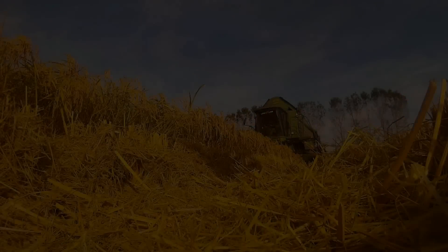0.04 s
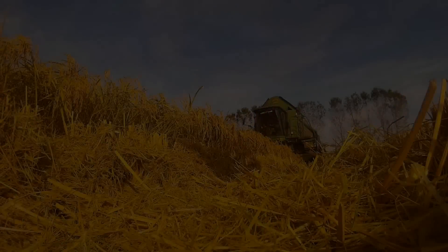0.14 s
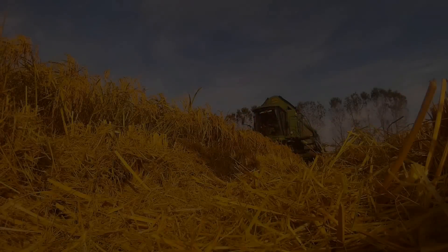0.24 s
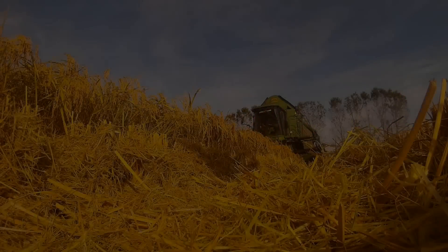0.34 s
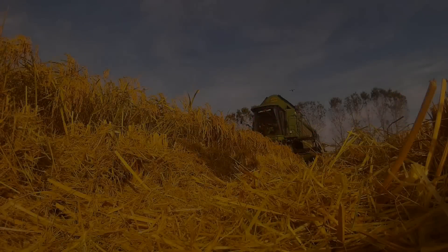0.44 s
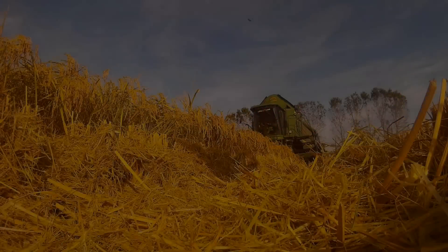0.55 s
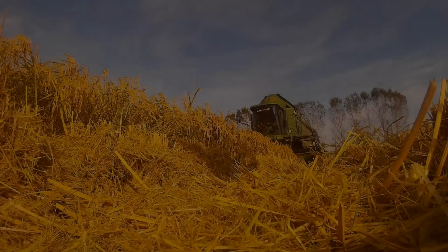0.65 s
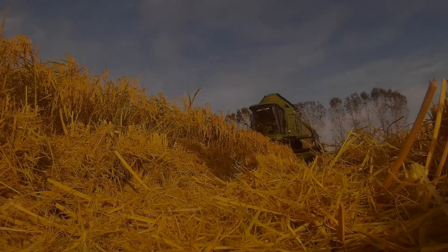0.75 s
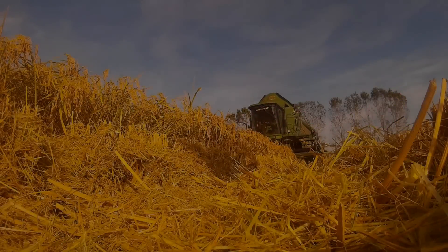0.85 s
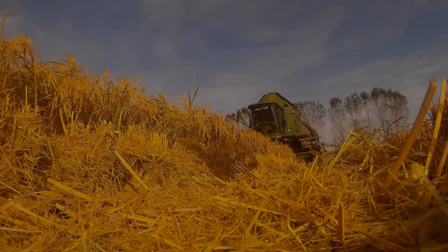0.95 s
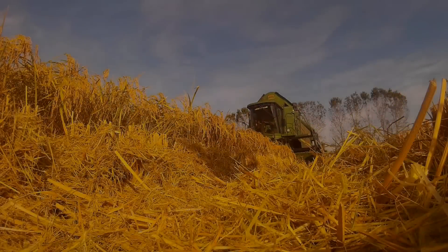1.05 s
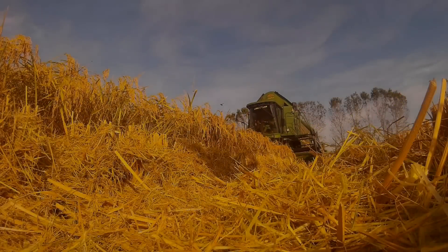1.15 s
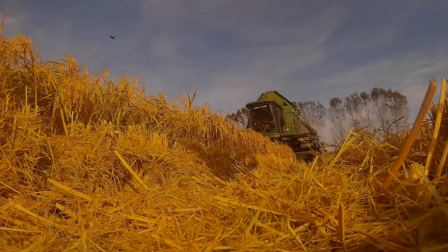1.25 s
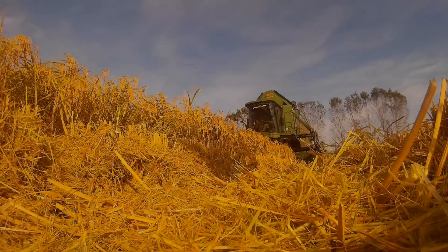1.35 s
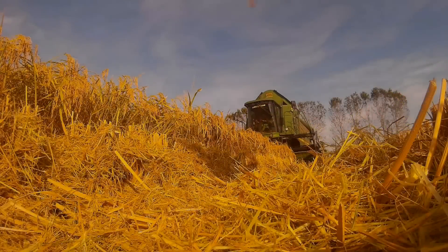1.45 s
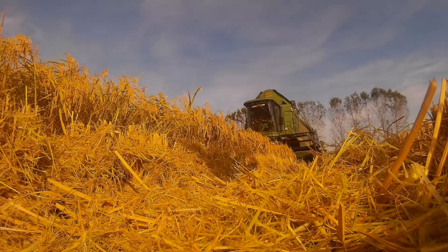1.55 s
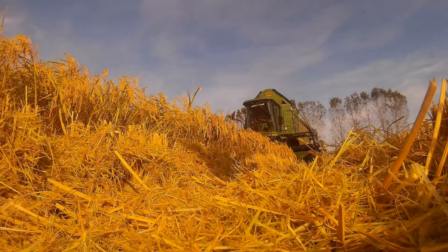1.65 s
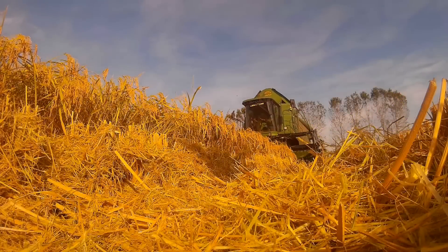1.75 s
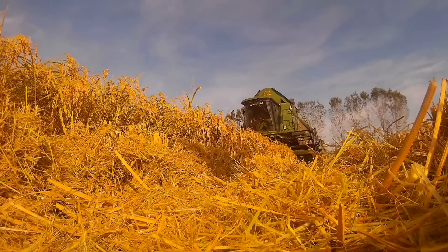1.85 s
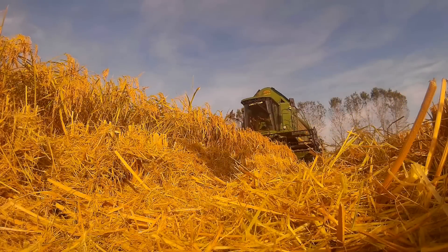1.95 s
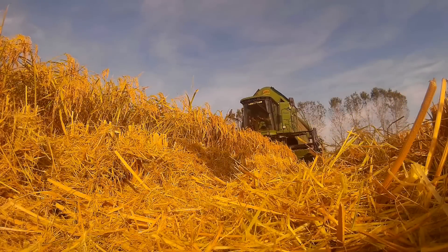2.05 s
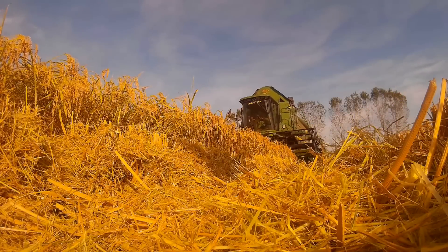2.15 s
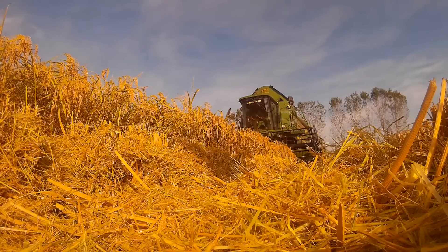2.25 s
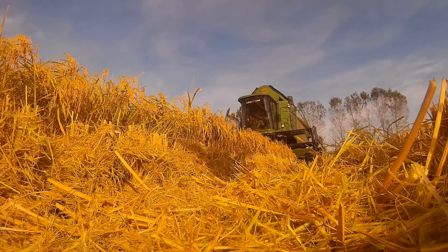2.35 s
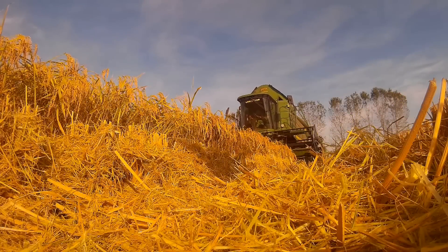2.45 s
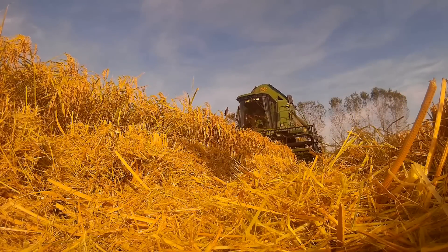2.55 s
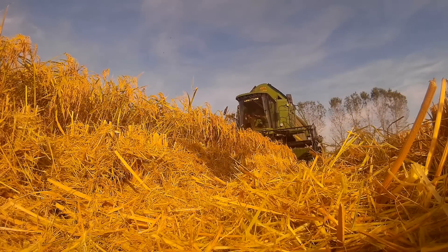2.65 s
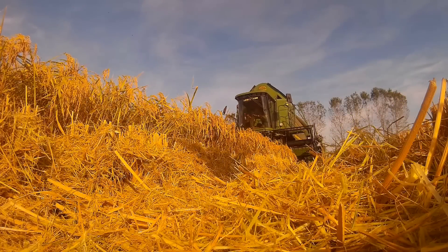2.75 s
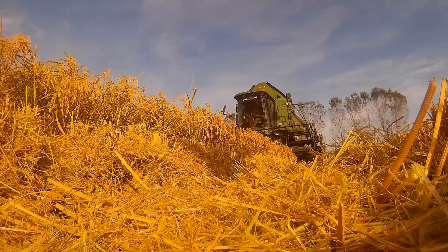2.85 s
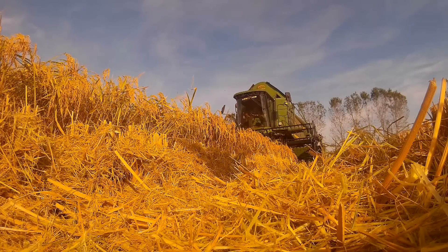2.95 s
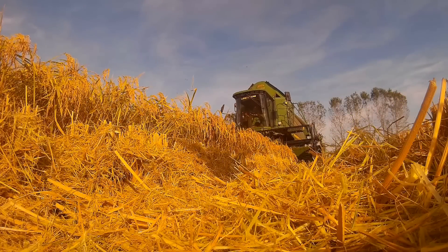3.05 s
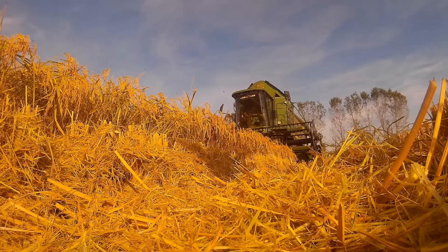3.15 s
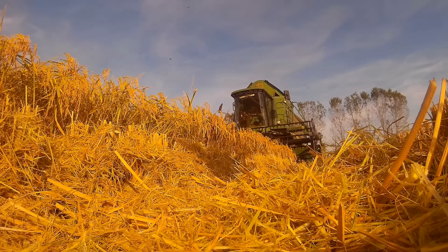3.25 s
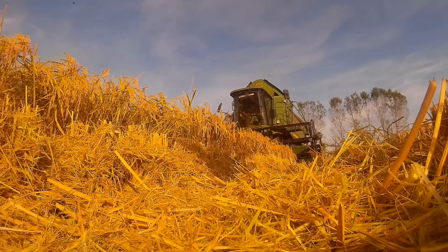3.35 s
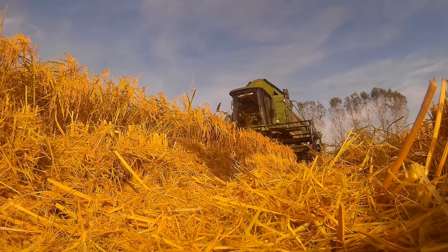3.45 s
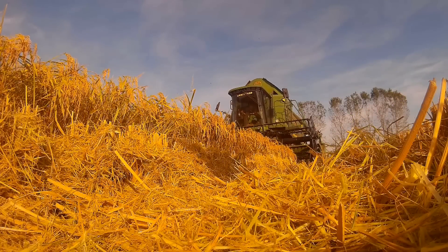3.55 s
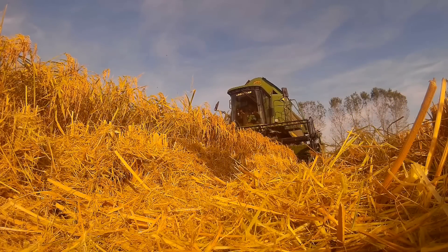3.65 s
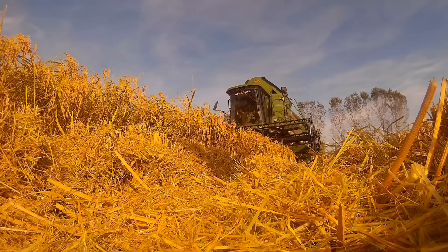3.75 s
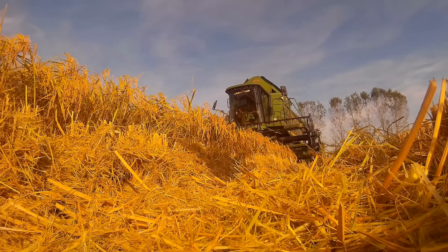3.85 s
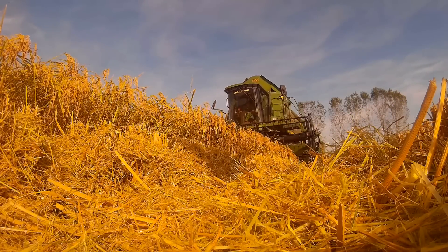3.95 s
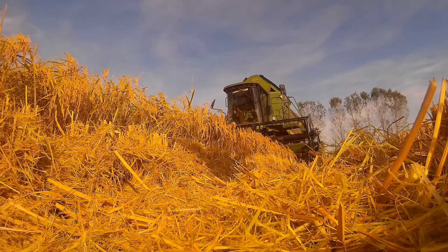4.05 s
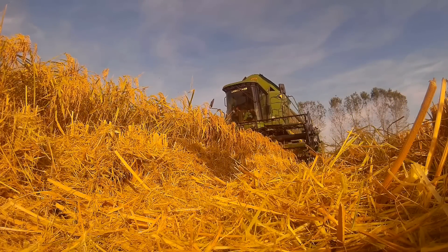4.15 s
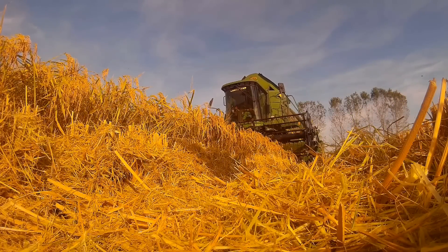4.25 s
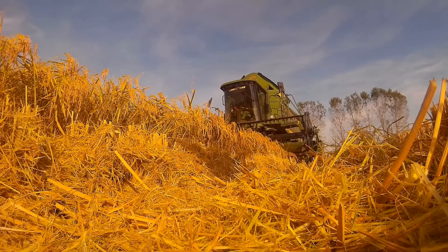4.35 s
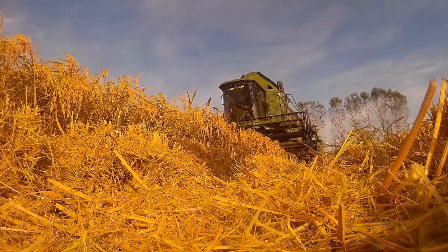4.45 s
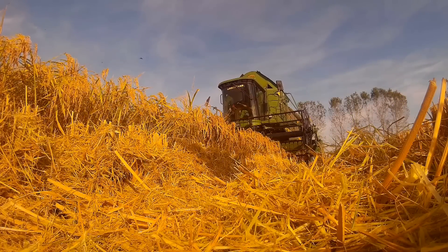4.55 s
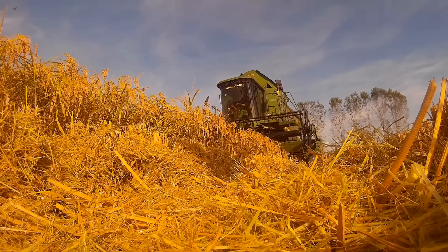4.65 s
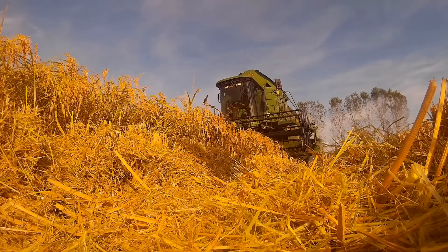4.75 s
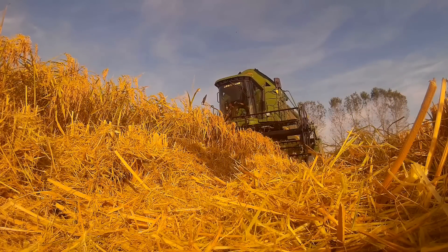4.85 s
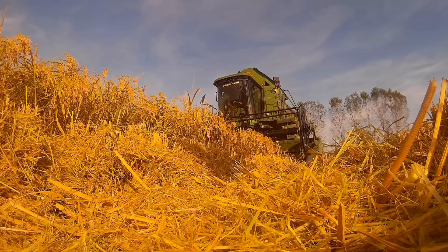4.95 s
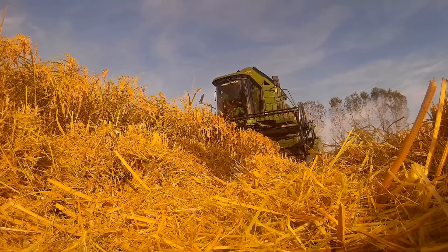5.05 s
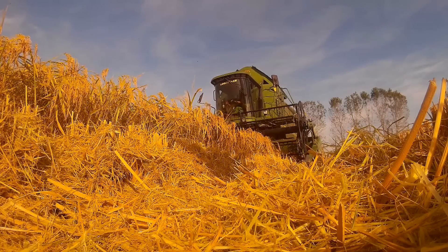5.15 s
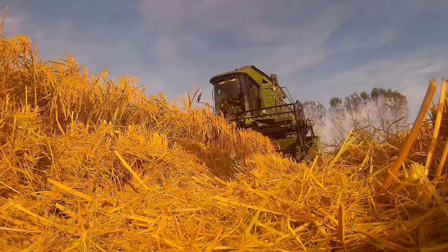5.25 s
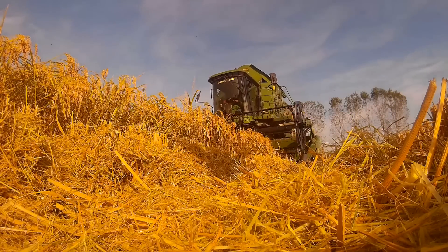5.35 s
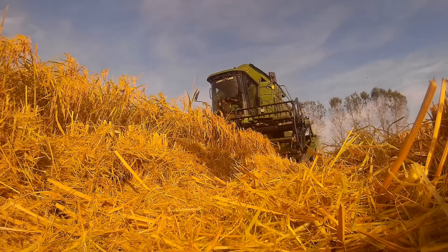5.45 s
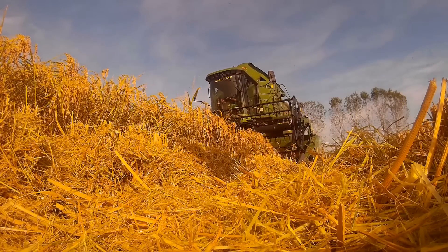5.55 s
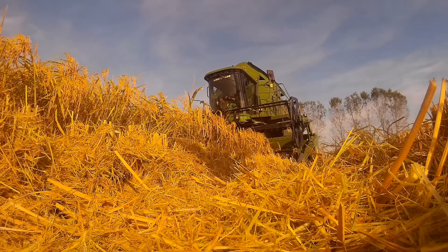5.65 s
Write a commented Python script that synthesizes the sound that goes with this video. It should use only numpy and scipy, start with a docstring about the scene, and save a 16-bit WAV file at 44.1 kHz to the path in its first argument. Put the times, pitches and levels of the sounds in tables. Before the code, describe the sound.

A combine harvester drones steadily across a straw field, fading in from quiet and growing slightly louder as it creeps closer, muffled and whining.

```python
"""A combine harvester comes slowly nearer through a straw field, heard from low in the stubble, which swallows treble.
The diesel's hum is a few tones in step with its firing; its uneven thumps shake the noise of roar, ground and straw.
The pump whines and wanders with load, the fan sings one note and the drum swells under wads of crop.
The straw rush throbs with the shaking sieves, and tin rattles and chaff hisses faintly.
Microphone hiss lies under it and everything fades in."""
import sys
import numpy as np
from scipy import signal
from scipy.fft import rfft, irfft, next_fast_len
from scipy.io import wavfile
from scipy.ndimage import uniform_filter1d

SR = 44100
rng = np.random.default_rng(int(sys.argv[2]) if len(sys.argv) > 2 else 0)


def generate_wav(sig):
    """Save sig (samples, or channels by samples) to the path in sys.argv[1] as 16-bit PCM at SR."""
    pcm = np.round(np.clip(np.atleast_2d(sig).T, -1, 1) * 32767).astype(np.int16)
    wavfile.write(sys.argv[1], SR, pcm)


N = 251811

# Steady tones of the engine. Each row: multiple of half the firing rate, level in dB within the hum.
ENGINE_ORDERS = [(1.001, -23), (2, -12), (3, -8.5), (3.83, -13.5), (4, -14.5), (5, -21)]
# The pump as its load wanders. Each row: time in seconds, whine pitch in Hz, swell of the whole machine
# in dB, then levels in dB against the roar of the whine, its octave, a lower shaft note and the note at half its pitch.
PUMP = [(0, 465, -0.08, -13, -31, -14, -6), (.2, 467.4, -0.12, -9.5, -30, -16, -16),
        (.45, 468.2, -0.34, -7, -26.5, -22, -11.5), (.7, 465.4, -0.4, -8, -28, -18, -23),
        (.9, 461.3, -0.4, -4, -28, -11, -17), (1.1, 457.7, -0.49, -8.5, -24, -11, -23),
        (1.3, 453.9, -0.5, -4.5, -19, -8.5, -25), (1.55, 453.5, -0.13, -4, -21.5, -9, -24),
        (1.8, 450, 0.0069, -7, -21.5, -14, -21), (2.05, 450, 0.046, -4, -22, -11, -20.5),
        (2.25, 454, 0.077, -4, -19, -5, -15), (2.5, 453.4, 0.043, -1, -20, -11.5, -13.5),
        (2.75, 453.8, 0.1, -2, -14, -4, -17), (2.95, 456, -0.05, -3, -21, -8, -18),
        (3.15, 458, 0.053, -3, -21, -10.5, -9), (3.4, 458.6, 0.034, -7, -21, -11.5, -15.5),
        (3.6, 457.6, 0.14, -6.5, -22, -10, -12.5), (3.85, 460.3, 0, -3.5, -23, -20, -11),
        (4.1, 462.8, -0.06, -5, -21, -16.5, -15), (4.4, 460.6, 0, -6.5, -22.5, -16, -11),
        (4.7, 458.3, 0.096, -10.5, -23, -13.5, -5.5), (5.0, 458.1, 0, -15, -23, -11, -9),
        (5.25, 455.7, 0, -5.5, -27.5, -12, -15), (5.5, 451.2, 0, -9, -21, -13, -7),
        (5.7, 449.2, -0.054, -9, -16.5, -21, -23)]

# Colours of the noises. Each row: frequency in Hz, level in dB per Hz.
ROAR_COLOUR = [(80, -39.5), (130, -7), (160, -3), (190, -4), (225, -3), (270, -3), (350, -6), (420, -4),
               (445, -6.5), (480, -8.5), (520, -16.5), (700, -63.5)]  # drum and fan roar
RUMBLE_COLOUR = [(14, -47.5), (24, -19), (40, -7), (70, -3.5), (100, -0.5), (140, -3), (190, -25.5),
                 (300, -92.5)]  # ground rumble
STRAW_COLOUR = [(300, -43.5), (440, -7), (500, -2.5), (600, 0), (700, -2.5), (800, -8), (890, -13.5),
                (1000, -19), (1080, -23), (1150, -34), (1500, -66.5)]  # straw rush
RATTLE_COLOUR = [(800, -23), (1140, -7), (1195, 3), (1290, -1.5), (1350, 2), (1440, -3), (1750, -7.5),
                 (2020, -4), (2330, -8), (2480, -13.5), (2620, -24.5), (3200, -34), (4500, -56)]  # thin tin rattle
CHAFF_COLOUR = [(2800, -18.5), (3600, -3), (4500, 0), (5500, -6.5), (7000, -20.5)]  # faint chaff hiss
HISS_COLOUR = [(1500, -10), (2800, 8), (4000, 3), (5500, 2), (8000, 2.5), (11500, 1.5), (13500, -0.5),
               (14900, -5.5), (15200, -10), (16000, -9.5)]  # microphone hiss

# Brief changes of level. Each row: middle of the change in seconds, change in dB.
DRUM_SWELLS = [(.36, 8), (1.27, 10.5), (1.72, 6.5), (1.83, 12), (1.98, 10), (2.6, 6.5), (2.75, 10.5),
               (3.05, 6.5), (3.45, 8), (3.6, 8.5), (4.85, 5), (5.11, 9), (5.45, 11.5)]  # wads of crop load the drum
STRAW_SURGES = [(.38, 2.5), (.57, 2), (.94, 4), (1.38, -2.5), (1.87, 4), (2.09, 1), (2.16, -4.5),
                (2.49, 1.5), (2.82, -3.5), (3.13, 1.5), (3.3, -1.5), (3.52, 1.5), (3.74, -3), (3.98, 2),
                (4.05, -2.5), (4.13, 2.5), (4.45, 1), (4.67, -1), (4.81, -3), (4.88, 4.5), (5.24, 1.5),
                (5.31, -2), (5.65, 2.5)]  # the straw rush surges and dips
WHINE_DIPS = [(.6, -13), (1.21, -2), (1.84, -5.5), (2.17, -12), (2.4, -6.5), (2.83, -9), (2.97, -6),
              (3.7, 3), (4.35, -6), (4.55, -2), (4.76, -6.5), (5.04, -8), (5.34, -5.5), (5.54, -9)]  # the whine mostly sinks
ROAR_SURGES = [(.17, -2.5), (.29, 3), (.57, -0.5), (1.0, -1), (1.35, 0), (1.62, -5), (1.85, 2), (2.15, -3),
               (2.4, 2.5), (2.5, -1.5), (2.95, -6.5), (3.13, 3), (3.5, 3.5), (3.67, -2.5), (4.05, -3.5),
               (4.4, 2), (4.67, -3), (4.95, 1.5), (5.36, 0.5), (5.49, 4.5), (5.55, -6.5)]  # the roar surges and dips as the feed varies
HUM_SWELLS = [(.35, -12), (.95, 1), (1.85, 1), (2.45, 2), (2.9, 0.5), (3.2, 1), (3.5, -3), (3.75, 2.5),
              (4.72, -2), (4.9, 1.5)]  # the engine hum swells and sinks
RUMBLE_SWELLS = [(.6, -2), (1.7, 3.5), (3.1, -2.5), (4.7, -4), (5.3, 1.5)]  # the ground rumble swells and sinks
LOWER_DIPS = [(1.1, -4), (1.45, -4.5), (1.9, -4), (2.12, -5), (2.5, -9), (2.85, -3.5), (3.25, -5),
              (3.45, -3), (3.68, -7), (4.9, -5), (5.15, -5), (5.4, -4)]  # the lower shaft note drops back
# Half-lengths of those changes, in seconds
DRUM_SWELL_S, STRAW_SURGE_S, WHINE_DIP_S, ROAR_SURGE_S = 0.056, 0.024, 0.019, 0.022
HUM_SWELL_S, RUMBLE_SWELL_S, LOWER_DIP_S = 0.076, 0.13, 0.036

START_M, SPEED_M_S = 26.9, 1.56  # distance at 0 s, ground speed
ROAR_DB, ROAR_HALVING_DB = -32, 3  # roar level at START_M; whole machine's gain per halving of distance
# Each pair: dB against the roar at START_M, extra dB gained per halving of the distance.
# Less stubble then lies in the way of the treble.
RUMBLE_LEVEL, STRAW_LEVEL, RATTLE_LEVEL = (-10.5, 3.4), (-4, 5.4), (-30.5, 6.0)
CHAFF_LEVEL, HUM_LEVEL = (-59, 13), (-2.5, 7.3)

ENGINE_HZ, PUMP_HZ = 56.45, 459  # half the firing rate when the pump is at its middle pitch; that pitch
GOVERNED = 0.94  # share of the pump's sag that engine and fan follow
CHUG_JITTER_S, CHUG_SCATTER_DB = 0.001595, 3.0  # how unevenly timed and how unequal the thumps are
FAN_HZ, FAN_DB = 302.4, -12  # blade note at middle speed, its level within the hum
LOWER_NOTE = 0.827  # pitch of the lower shaft note as a share of the whine's
DRUM_HZ, DRUM_DB = 99.86, -17.5  # beater bars passing; level against the roar between wads
SIEVE_HZ = 8.0  # middle shaking rate
FLUTTER_DB = 1.5  # quick flutter on every tone, carried through moving air
HISS_DB = -73.5
FADE_FROM_DB, FADE_S = -11.5, 1.69  # the fade is already under way at 0 s
TOP_HZ = 15700


def undb(db):
    """Turn decibels into a plain multiplier."""
    return 10 ** (np.asarray(db) / 20)


def unit(x):
    """Scale a sound to an average strength (rms) of 1."""
    return x / np.sqrt(np.mean(x ** 2))


def curves(table):
    """Columns of a table after the time column, read at every sample."""
    seconds, *columns = np.transpose(table)
    t = np.arange(N) / SR
    return [np.interp(t, seconds, column) for column in columns]


def walk(rate):
    """Random levels, new ones `rate` times a second, smoothed twice; spread near 1."""
    hold = int(SR / rate)
    steps = np.repeat(rng.standard_normal(N // hold + 1), hold)
    smooth = uniform_filter1d(uniform_filter1d(steps, hold), hold)
    return 1.3 * smooth[:N]


def swells(rows, half_s):
    """Bell-shaped level changes in dB at given moments."""
    t = np.arange(N) / SR
    return sum(db * np.exp(-((t - middle) / half_s) ** 2 / 2) for middle, db in rows)


def coloured(x, spectrum):
    """Give a flat sound the colour of (Hz, dB) points; rms 1."""
    size = next_fast_len(N)
    hz, db = np.transpose(spectrum)
    bins_hz = np.arange(size // 2 + 1) * SR / size
    # The added 1 Hz avoids the logarithm of zero; beyond the points nearly nothing is left.
    gain = undb(np.interp(np.log(bins_hz + 1), np.log(hz), db, -90, -90))
    return unit(irfft(rfft(x, size) * gain, size)[:N])


def tone(hz, waver_db, waver_hz):
    """A sine, rms 1 before its level wavers and flutters; its pitch wavers too."""
    phase = 2 * np.pi * np.cumsum(hz + waver_hz * walk(6)) / SR
    level = undb(waver_db * walk(8.9) + FLUTTER_DB * walk(30))
    return np.sqrt(2) * level * np.sin(phase + 2 * np.pi * rng.random())


def rush(spectrum, throb_db, thumps, churn_db):
    """Air and crop in motion: noise shaken by engine thumps, throbbing and churning."""
    shaken = rng.standard_normal(N) + thumps
    return coloured(shaken * undb(throb_db + churn_db * walk(9)), spectrum)


def nearer(level, halvings):
    """Loudness growing as the distance shrinks; level is (dB at START_M, dB per halving)."""
    start_db, halving_db = level
    return undb(start_db + halving_db * halvings)


def speed():
    """Shaft speed against its middle: it sags with the pump, steadied by the governor."""
    return (curves(PUMP)[0] / PUMP_HZ) ** GOVERNED


def chug():
    """Every second firing thumps harder: uneven clicks for those firings, rms 1."""
    turns = np.cumsum(ENGINE_HZ * speed()) / SR
    at = np.flatnonzero(np.diff(np.floor(turns)))
    timing, strength = rng.standard_normal((len(at), 2)).T
    late = (CHUG_JITTER_S * SR * timing).astype(int)  # negative means early
    clicks = np.zeros(N)
    clicks[np.clip(at + late, 0, N - 1)] = undb(CHUG_SCATTER_DB * strength)
    return unit(clicks)


def sieves():
    """The sieves shake to and fro and pump the flow: a slow wave between -1 and 1."""
    return np.sin(2 * np.pi * np.cumsum(SIEVE_HZ + 0.52 * walk(1.5)) / SR)


def engine():
    """Uneven cylinders and belt-driven parts leave a few steady tones."""
    half_rate = ENGINE_HZ * speed()
    hum = sum(undb(db) * tone(k * half_rate, waver_db=2.5, waver_hz=1.096) for k, db in ENGINE_ORDERS)
    return undb(swells(HUM_SWELLS, HUM_SWELL_S)) * hum


def pump():
    """Piston whine, its octave and two shaft notes below it, sagging under load and flickering."""
    hz, _, whine_db, octave_db, lower_db, half_db = curves(PUMP)
    hz = hz + 1.16 * walk(18)
    whine_db = whine_db + swells(WHINE_DIPS, WHINE_DIP_S) + 0.75 * walk(16)
    lower_db = lower_db + swells(LOWER_DIPS, LOWER_DIP_S)
    whine = undb(whine_db) * tone(hz, waver_db=0.2, waver_hz=0)
    octave = undb(octave_db) * tone(2 * hz, waver_db=2.2, waver_hz=1.5)
    lower = undb(lower_db) * tone(hz * LOWER_NOTE, waver_db=2.5, waver_hz=1.2)
    half = undb(half_db) * tone(hz / 2, waver_db=1.0, waver_hz=1.8)
    return whine + octave + lower + half


def drum():
    """Bars slowed unevenly by the crop: a low note that swells under each wad."""
    level = undb(DRUM_DB + swells(DRUM_SWELLS, DRUM_SWELL_S))
    return level * tone(DRUM_HZ, waver_db=2.5, waver_hz=1.5)


def fan():
    """Blades passing at a steady count per turn: one note that follows the shaft speed."""
    return undb(FAN_DB) * tone(FAN_HZ * speed(), waver_db=1.3, waver_hz=1.5)


def roar(sieve, thumps):
    """Drum and fan air: broad low noise with a slight throb, surging as the feed varies."""
    level = undb(-0.36 + swells(ROAR_SURGES, ROAR_SURGE_S))
    return level * rush(ROAR_COLOUR, 0.15 * sieve, undb(-10.5) * thumps, churn_db=0.0)


def straw(sieve, thumps):
    """Straw rushing through: noise with the strongest sieve throb, surging and dipping."""
    level = undb(swells(STRAW_SURGES, STRAW_SURGE_S))
    return level * rush(STRAW_COLOUR, 0.98 * sieve, undb(-10.5) * thumps, churn_db=0.5)


def rumble(sieve, thumps):
    """Rumble through the ground: very low noise that swells and sinks."""
    level = undb(swells(RUMBLE_SWELLS, RUMBLE_SWELL_S))
    return level * rush(RUMBLE_COLOUR, 0.1 * sieve, undb(-18.5) * thumps, churn_db=1.5)


def rattle(sieve, thumps):
    """Thin tin shaken by sieves and engine: noise with several narrow peaks."""
    return rush(RATTLE_COLOUR, 0.33 * sieve, undb(-12.5) * thumps, churn_db=1.0)


def chaff():
    """Fine flying chaff: a steady high hiss."""
    return coloured(rng.standard_normal(N), CHAFF_COLOUR)


def microphone_hiss():
    """The microphone's own noise, the same at any distance."""
    return undb(HISS_DB) * coloured(rng.standard_normal(N), HISS_COLOUR)


def scene():
    """Mix the machine, bring it nearer, add the hiss and fade in."""
    t = np.arange(N) / SR
    halvings = np.log2(START_M / (START_M - SPEED_M_S * t))  # how often the distance has halved
    thumps = chug()
    sieve = sieves()

    machine = nearer(HUM_LEVEL, halvings) * (engine() + fan())
    machine += pump() + drum() + roar(sieve, thumps)
    machine += nearer(STRAW_LEVEL, halvings) * straw(sieve, thumps)
    machine += nearer(RUMBLE_LEVEL, halvings) * rumble(sieve, thumps)
    machine += nearer(RATTLE_LEVEL, halvings) * rattle(sieve, thumps)
    machine += nearer(CHAFF_LEVEL, halvings) * chaff()

    load_swell_db = curves(PUMP)[1]
    approach = nearer((ROAR_DB + load_swell_db, ROAR_HALVING_DB), halvings)
    fade = np.interp(t, [0, FADE_S], [undb(FADE_FROM_DB), 1])  # a straight ramp
    mix = fade * (approach * machine + microphone_hiss())
    return mix[None]  # one channel


def record(dry):
    """The recorder cuts the top with a steep low-pass filter."""
    low_pass = signal.ellip(12, 0.2, 70, TOP_HZ, fs=SR, output="sos")
    return signal.sosfilt(low_pass, dry)


dry = scene()
out = record(dry)
generate_wav(out)
```